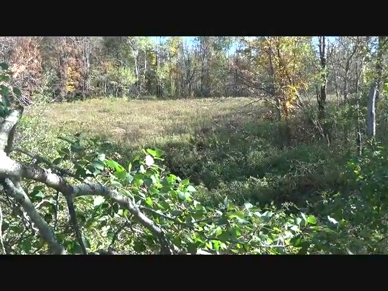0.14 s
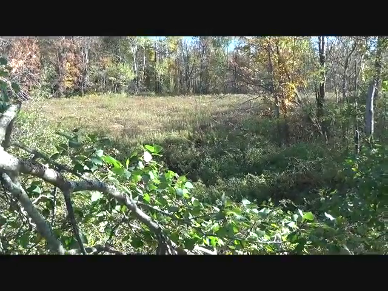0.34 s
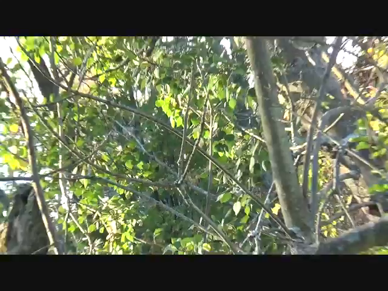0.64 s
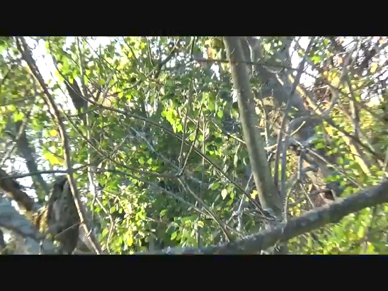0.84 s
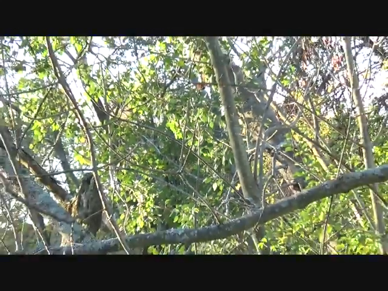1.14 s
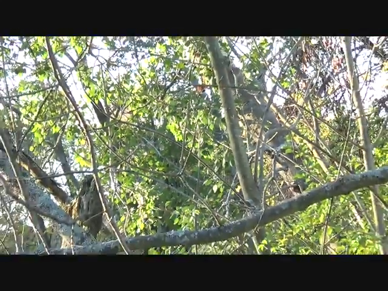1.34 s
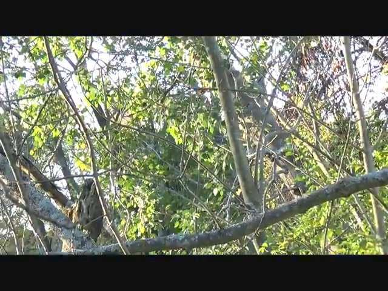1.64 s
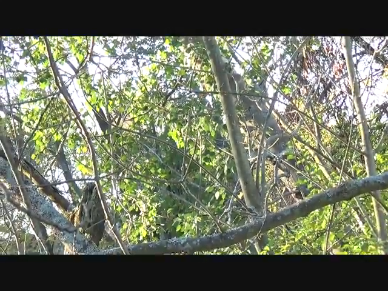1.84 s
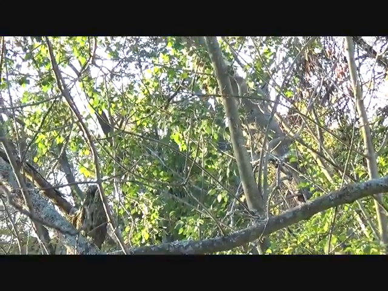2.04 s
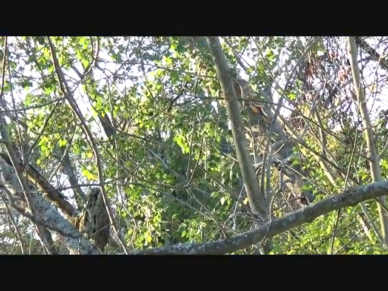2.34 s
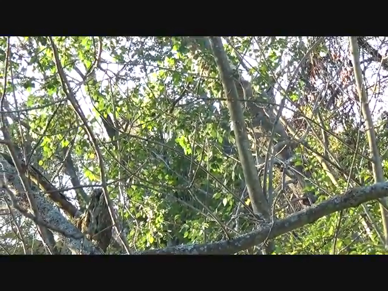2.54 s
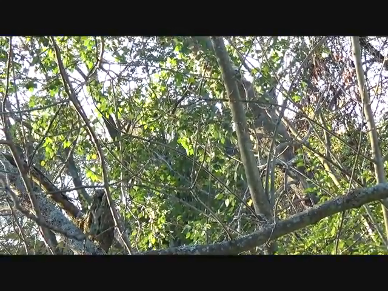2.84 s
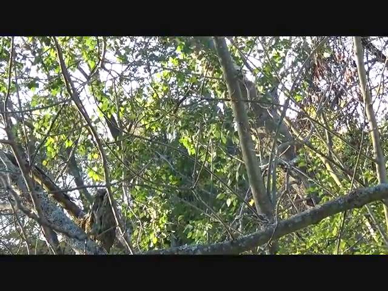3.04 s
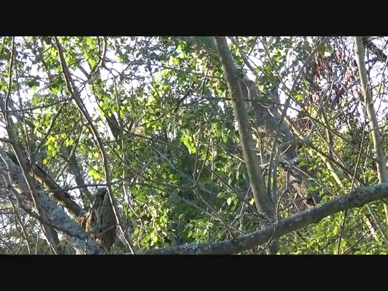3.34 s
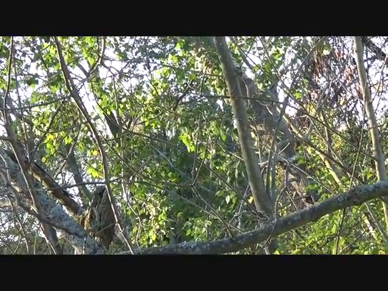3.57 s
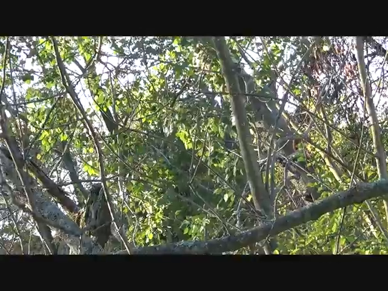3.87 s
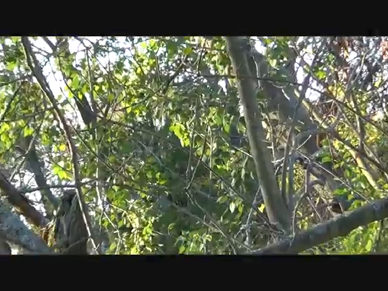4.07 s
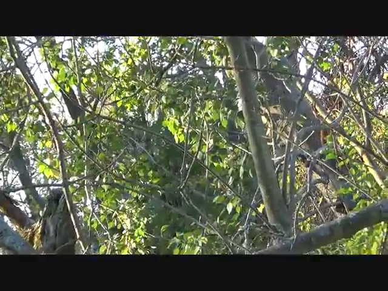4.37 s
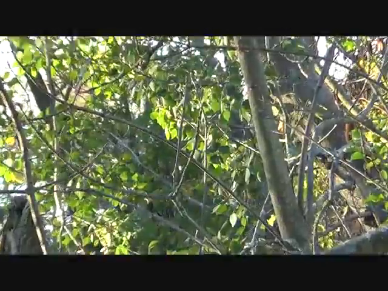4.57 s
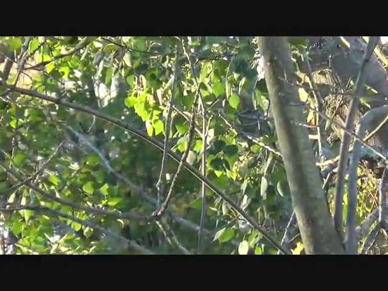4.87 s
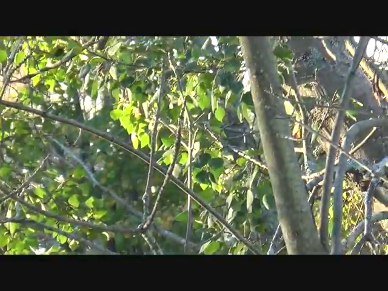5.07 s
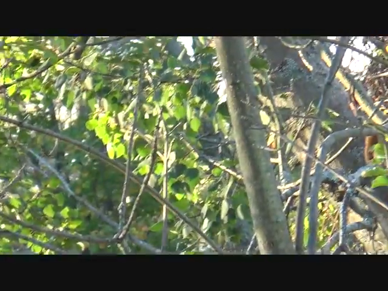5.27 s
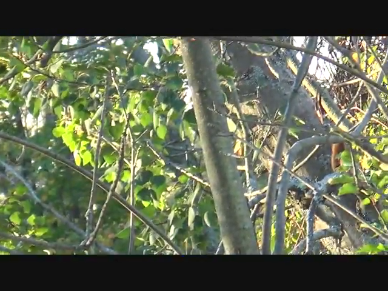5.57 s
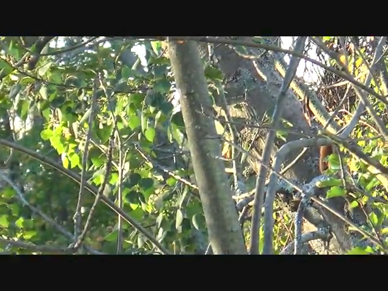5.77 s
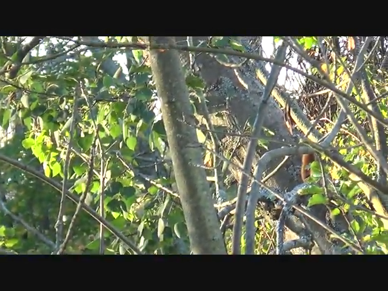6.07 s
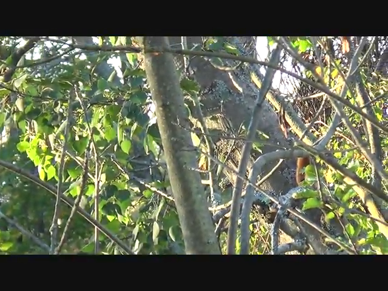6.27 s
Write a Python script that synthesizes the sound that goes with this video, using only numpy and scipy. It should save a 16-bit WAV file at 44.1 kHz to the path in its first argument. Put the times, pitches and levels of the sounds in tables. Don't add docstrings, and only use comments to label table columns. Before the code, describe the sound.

A small handheld camera's built-in stereo microphone picks up faint bird chirps, far-off engines and traffic, and a thin high electronic whine. Light plastic ticks and knocks betray the holding hand. After more than three seconds of near quiet, a squirrel starts a close machine-gun chatter of short buzzy, high syllables, swelling louder and spacing out slightly until the end, ringing briefly off trunks and leaves.

```python
import sys
import numpy as np
from scipy import signal
from scipy.fft import rfft, irfft
from scipy.io import wavfile
from scipy.ndimage import uniform_filter1d

SR = 44100
rng = np.random.default_rng(int(sys.argv[2]) if len(sys.argv) > 2 else 0)


def ratio_of_db(decibels):
    return 10 ** (np.asarray(decibels, float) / 20)


def int16_out(signal):
    q = np.round(np.clip(np.atleast_2d(signal).T, -1, 1) * 32767)
    wavfile.write(sys.argv[1], SR, q.astype(np.int16))


N = 282681
TIME = np.arange(N) / SR


def evened(x):
    return x / np.sqrt(np.mean(abs(x) ** 2) + 1e-20)


def at_time(points, s):
    return np.interp(s, *np.transpose(points))


def at_pitch(points, hz):
    f, value = np.transpose(points)
    return np.interp(np.log(hz + 1), np.log(f + 1), value)


def played(source, rows):
    mix = np.zeros(N)
    for row in rows:
        s, sound = source(*row)
        part = mix[round(s * SR):][:len(sound)]
        part += sound[:len(part)]
    return mix


def cavity(modes, hz):
    power = 1e-8
    for f, width, db in modes:
        detune = (hz ** 2 - f ** 2) / (hz + 1) / width / 0.95
        power = power + ratio_of_db(2 * db) / (1 + detune ** 2) ** 2
    return np.sqrt(power)


def causal_phase(magnitude):
    circle = np.log(np.r_[magnitude, magnitude[-2:0:-1]])
    return np.exp(-1j * signal.hilbert(circle).imag[:len(magnitude)])


def whistle(hz, fuzz_hz):
    wander = fuzz_hz * evened(uniform_filter1d(rng.standard_normal(len(hz)), 60))
    return np.sqrt(2) * np.sin(2 * np.pi * (np.cumsum(hz + wander) / SR + rng.random()))


# (time [s], syllable number)
PACE = [(3.6692, 0), (3.7355, 2), (3.9406, 8), (4.1147, 13), (4.3647, 20), (4.5838, 26), (4.8093, 32),
        (4.9618, 36), (5.322, 45), (5.5776, 51), (5.622, 52), (5.7181, 54), (5.92, 58), (5.9758, 59),
        (6.0386, 60)]
# (time [s], mouth level [dB], pulse rate [Hz], upper mouth re mouth [dB], throat re mouth [dB])
EFFORT = [(3.671, -37, 1304, 5, 2), (3.71, -35, 1000, 6.5, -1), (3.88, -32.5, 963, 5, -5),
          (4.29, -30.5, 955, 5.5, -7), (4.39, -27.5, 958, -5, -10), (4.72, -25, 948.6, -5.5, -11),
          (4.96, -25.5, 897.7, -3.5, -12.5), (5.93, -24, 901, -10.5, -15.5), (6.04, -27.5, 866, -10, -17)]
# (length [ms], mouth [dB], pulse rate [Hz], upper mouth [dB], throat [dB])
SPREAD = (.8, .6, 30, 1.2, 1.0)


def rattle():
    pace_s, number = np.transpose(PACE)
    s = np.interp(np.arange(number[-1] + 1), number, pace_s)
    effort = np.transpose(EFFORT)
    ms = np.where(s == s[0], 14, 12.2)
    voice = np.array([ms] + [np.interp(s, effort[0], column) for column in effort[1:]]).T
    chance = np.clip(rng.standard_normal(voice.shape), -2, 2)
    return np.c_[s, voice + SPREAD * chance]


SLOWING = .19
SHIMMER_DB, WOBBLE = 1.1, .018


def voice_pulses(hz, lead, ms, pulses_hz, chance):
    slowing = SLOWING * (np.arange(24) * 1000 / pulses_hz / ms - .5)
    periods = (1 + slowing + .014 * chance[0]) / pulses_hz
    at = np.cumsum(periods) - 0.377 / pulses_hz
    swell = np.interp(at * 1000 / ms, [0, .15, .5, .85, 1, 1.1], [.7, .9, 1, .8, .55, 0])
    swell = swell * ratio_of_db(SHIMMER_DB * chance[1])
    pulses = (swell * np.exp(-2j * np.pi * hz[:, None] * (at + lead))).sum(1)
    puff = 1 / (1 + 2j * np.pi * hz * .0012)
    breath = irfft(pulses * puff)
    puffs = rfft(breath * rng.standard_normal(len(breath)))
    rasp = .3 * (hz < 7800)
    drive = evened(pulses) + (ratio_of_db(-10) + rasp) * evened(puffs)
    return drive * (1 + .05 * np.exp(-2j * np.pi * hz * 0.0005024))


# (frequency [Hz], width [Hz], level [dB])
VOICE_BOX = [(2180, 1950, -11.5), (3210, 570, 1)]
THROAT = [(3440, 6000, -15), (4500, 1220, 0.5), (6355, 600, -5)]
MOUTH = [(9806, 1430, 8.5), (10420, 390, 2)]
UPPER_MOUTH = [(11340, 370, 7.5), (12710, 1010, 7), (12400, 830, -9)]
TEETH = [(15200, 1200, 0)]
# (time [s], level re mouth [dB])
SQUEAK = [(3.6, -4), (4.3, -12), (4.5, -12), (5.3, -12.5), (6.1, -12.5)]


def syllable(s, ms, mouth_db, pulses_hz, upper_db, throat_db):
    lead, size = .005, 2048
    t, hz = np.arange(size) / SR - lead, np.fft.rfftfreq(size, 1 / SR)
    chance = rng.standard_normal((3, 24))
    u = t / (ms / 1000)
    drive = voice_pulses(hz, lead, ms, pulses_hz, chance)

    def gape(middle, spread):
        return np.exp(-((u - middle) / spread) ** 2)

    late = np.clip(u / .22, 0, 1)
    shapes = [gape(.45, .7), gape(.42, .45), gape(.38, .33)]
    parts = [(MOUTH, 0, 1), (UPPER_MOUTH, upper_db, late)]
    parts += [(TEETH, .5 * upper_db - 17, late), (VOICE_BOX, -23., shapes[0])]
    parts += [([mode], throat_db + mode[2] - .3, shape) for mode, shape in zip(THROAT, shapes)]
    colours = []
    for (modes, db, _), shift in zip(parts, chance[2]):
        colours.append(ratio_of_db(db) * evened(cavity(modes, hz * (1 + WOBBLE * shift))))
    drive = drive * causal_phase(np.linalg.norm(colours, axis=0))
    level = np.sqrt(ms / 1000 * SR / size) / irfft(drive * colours[0]).std()
    sound = level * sum(shape * irfft(drive * colour) for colour, (_, _, shape) in zip(colours, parts))

    glide = np.clip(3500 * (1 + 3 * WOBBLE * chance[2, 8]) - 450000.0 * t, 2900, 4800)
    squeak = np.exp(-((t + .0004) / .0014) ** 2) * whistle(glide, fuzz_hz=200)
    lips_hz = 9200 * (1 + WOBBLE * chance[2, 9]) + 0 * t
    lips = np.exp(-((t - .0009) / .0012) ** 2) * whistle(lips_hz, fuzz_hz=200)
    chest_hz = pulses_hz * (1 - SLOWING * (np.clip(u, 0, 1) - .5))
    chest = gape(0.62, 0.42) * whistle(chest_hz, fuzz_hz=57.5)
    sound += ratio_of_db(at_time(SQUEAK, s) + SHIMMER_DB * chance[2, 10]) * squeak
    sound += ratio_of_db(-4.1) * lips + ratio_of_db(-15 + 0.33 * throat_db) * chest
    return s - lead - .0005, ratio_of_db(mouth_db) * sound


# (frequency [Hz], fade time [s])
ECHO_FADE = [(500, 0.098), (2000, 0.43), (4500, 0.44), (10000, 0.28), (15000, 0.11)]
# (frequency [Hz], level [dB])
SCATTER = [(900, 3), (2300, 3), (4500, -1.5), (7000, .3), (9800, -2), (11800, 2.5), (13500, 4), (15000, 6)]


def trees(x):
    out = np.zeros((2, N))
    for k in range(3):
        taps = rng.standard_normal((2, SR // 2)) * (rng.random((2, SR // 2)) < .05)
        taps[:, :150] = 0
        taps[1] = .83 * taps[0] + .56 * taps[1]
        hz, t, z = signal.stft(taps, SR, nperseg=128)
        fade_db = at_pitch(SCATTER, hz)[:, None] - 60 * t / at_pitch(ECHO_FADE, hz)[:, None]
        tail = signal.istft(z * ratio_of_db(fade_db), SR, nperseg=128)[1]
        tail = tail / np.linalg.norm(tail[0])
        turn = np.sqrt(2 / 3) * np.cos(np.pi * (2.3 * TIME + k / 3))
        out += signal.fftconvolve((x * turn)[None], tail, axes=1)[:, :N]
    return out


def tick(s, db, ring_hz, width_hz, ms):
    t = np.arange(1024) / SR
    crackle = rng.standard_normal(1024) * np.exp(-(t * 1000 / ms) ** 2)
    body = cavity([(ring_hz, width_hz, 0)], np.fft.rfftfreq(1024, 1 / SR))
    sound = irfft(rfft(crackle) * body * causal_phase(body))
    return s, ratio_of_db(db) * sound / abs(sound).max()


# (time [s], peak level [dB])
TICKS = [(.766, -44), (.784, -44), (.991, -42), (1.042, -50), (1.116, -35), (1.152, -42), (1.16, -36.5),
         (1.172, -50), (1.207, -47), (1.224, -40), (1.261, -41), (1.4094, -15), (1.4104, -15), (1.821, -44),
         (2.454, -43), (2.7065, -39), (2.742, -44), (2.788, -36), (2.899, -48), (2.950, -39), (2.954, -40),
         (3.107, -42), (6.328, -47)]
# (time [s], peak level [dB], ring [Hz], crackle length [ms])
KNOCKS = [(0.955, -39.5, 1410, 13), (.988, -44, 2500, 5.6), (.995, -48, 2500, 18), (1.029, -46, 2200, 1.9),
          (1.41, -25.5, 3700, 0.91), (1.412, -38.5, 1100, 5.6), (2.788, -40, 4500, 2.9),
          (3.9723, -22.5, 2210, 1.25), (4.224, -35, 1410, 2.2), (4.294, -29.5, 1700, 2.5),
          (4.401, -27, 2190, 5.4), (4.6773, -29.5, 1500, 5.4), (5.0357, -35.5, 1500, 1.5),
          (5.155, -27, 1700, 2.7)]
# (time [s], peak level [dB], ring [Hz], crackle length [ms])
PINGS = [(.959, -52, 4800, 7.6), (.965, -52, 4500, 1.1), (.987, -38.5, 5030, 5.2),
         (0.989, -30.5, 1050, 2.8), (1.031, -42.5, 5130, 1.4), (1.032, -37.5, 960, .6),
         (1.160, -42, 2640, 0.79), (1.199, -46.5, 4500, 3.3), (1.41, -26, 14100, 0.55),
         (1.4104, -22, 9650, 1.1), (1.470, -51, 5000, 1.1), (2.716, -48, 4500, 0.6),
         (3.670, -46, 1310, 7.2), (3.824, -43, 1600, 7.8), (3.9709, -13, 4750, 3.8), (4.04, -37, 955, 10),
         (4.096, -34, 970, 14), (4.294, -37.5, 990, 2.5), (4.738, -33.5, 1050, 1.4),
         (6.380, -48, 3800, 1.5), (6.39, -40, 3300, 0.91)]


def handling():
    rows = [(s, db, 9800, 5300, .5) for s, db in TICKS]
    rows += [(s, db, hz, 0.9 * hz, ms) for s, db, hz, ms in KNOCKS]
    rows += [(s, db, hz, 0.3 * hz, ms) for s, db, hz, ms in PINGS]
    return played(tick, rows)


# (time [s], length [s], level [dB], start [Hz], end [Hz], fuzz [Hz])
BIRDS = [
    (.017, 0.038, -59, 3600, 3800, 150),
    (.018, 0.012, -58.5, 5370, 5650, 200),
    (.16, .017, -67, 5700, 5700, 100),
    (2.28, 0.08, -63, 5600, 5380, 300),
    (2.361, 0.05, -67, 5470, 5160, 300),
    (2.661, 0.18, -69.5, 2580, 2500, 39.75),
    (2.97, .28, -71, 3060, 3190, 40),
]


def bird(s, length, db, start_hz, end_hz, fuzz_hz):
    hz = np.linspace(start_hz, end_hz, round(length * SR))
    return s, ratio_of_db(db) * whistle(hz, fuzz_hz) * signal.windows.tukey(len(hz), .6)


# (time [s], length [s], level [dB], strongest tone [Hz])
EARLY_HUM = [
    (0, 0.245, -55, 134),
    (0.338, 0.27, -53.5, 134.5),
    (.05, 0.71, -62, 203.5),
]
LATE_HUM = [(.95, 0.4, -60, 153), (1.501, 0.52, -63.5, 156), (2.1, 0.85, -61, 163),
            (3.369, 0.9, -62.5, 161), (4.329, 0.58, -54.5, 163.5), (4.98, 0.81, -57.5, 160),
            (5.38, 0.34, -57, 167), (6.0, .45, -53, 163.6), (1.281, 0.21, -61.5, 291),
            (1.948, 0.59, -64.5, 291), (2.7, 0.64, -66.5, 290)]


def engine(s, length, db, hz):
    hz = np.full(round(length * SR), float(hz))
    return s, ratio_of_db(db) * whistle(hz, fuzz_hz=5.8) * signal.windows.tukey(len(hz), .4)


# (frequency [Hz], level per Hz [dB])
AIR = [(25, -30), (50, -40), (70, -9), (107, -1), (220, -4.5), (340, -8.5), (600, -8), (900, -8),
       (1300, -12), (1800, -18.5), (3500, -21.5), (7300, -25), (11000, -27.5), (15800, -29)]
# (time [s], level [dB])
TRAFFIC = [(0, -5.5), (.6, -1), (1.5, -0.8), (3.6, 0.15), (4.45, 5.5), (5.5, 5.6), (6.41, 6.5)]
# (frequency [Hz], likeness [0 to 1])
SAME = [(30, 0.39), (60, 0.61), (150, 0.93), (380, 0.86), (950, 0.99), (2380, 0.87), (4400, 0.86),
        (8100, 0.69), (11500, 1), (15000, 0.85)]
# (frequency [Hz], left minus right [dB])
LEAN = [(30, 21), (70, -7.5), (150, -1), (300, -1), (15000, 0)]


def air():
    frames, hz = N // 256 + 5, np.fft.rfftfreq(1024, 1 / SR)[:, None]
    a, b, c, d, patches = rng.standard_normal((frames, 513, 5)).T
    patches = evened(uniform_filter1d(uniform_filter1d(patches, 12, 0), 14, 1))
    t = np.arange(frames) * 256 / SR - 512 / SR
    traffic = at_time(TRAFFIC, t)
    first_view = 1.5 * (t < 0.75)
    rumble = (0.79 * traffic + 1.4 + first_view) / (1 + (hz / 350) ** 4)
    roar = traffic * np.exp(-np.log((hz + 1) / 1000) ** 2 / 0.99)
    rustle = (0.6 * np.maximum(traffic, 0) + 0.49) / (1 + (3000 / (hz + 1)) ** 4)
    same = np.clip(at_pitch(SAME, hz), -1, 1)
    left = a + 1j * b
    right = same * left + np.sqrt(1 - same ** 2) * (c + 1j * d)
    lean = np.array([.5, -.5])[:, None, None] * at_pitch(LEAN, hz)
    z = np.array([left, right]) * ratio_of_db(at_pitch(AIR, hz) + 0.68 * patches + lean)
    still = signal.istft(z, nperseg=1024, noverlap=768)[1]
    moving = signal.istft(z * ratio_of_db(rumble + roar + rustle), nperseg=1024, noverlap=768)[1]
    return ratio_of_db(-52.72) * moving[:, :N] / still.std()


# (frequency [Hz], level [dB])
CIRCUIT = [
    (7854, -86),
    (13119, -82),
    (13248, -82),
]


def whine():
    line_hz, beat_hz, field_hz = 15734.2, 12.785, 59.94
    turn = 2 * np.pi * line_hz * TIME
    line = np.sin(turn) + .55 * np.sin(turn + 2 * np.pi * beat_hz * TIME + 2.53)
    field = uniform_filter1d(1. * ((TIME * field_hz) % 1 > .05), 20)
    faint = sum(ratio_of_db(db) * np.sin(2 * np.pi * hz * TIME) for hz, db in CIRCUIT)
    return np.sqrt(2) * (ratio_of_db(-58.5) * line * field + faint)


def scene():
    squirrel = played(syllable, rattle())
    near = squirrel * ratio_of_db([[-.1], [.1]]) + ratio_of_db(-5.5) * trees(squirrel)
    near = near + handling() * ratio_of_db([[1.1], [-1.1]])
    engines = played(engine, EARLY_HUM) * ratio_of_db([[-4.5], [3.]])
    engines = engines + played(engine, LATE_HUM) * ratio_of_db([[-.8], [.8]])
    return near + played(bird, BIRDS) + engines + air() + whine()


# (frequency [Hz], side minus middle [dB])
STEREO_NEEDS = [(100, -40), (1200, -24), (2000, -9), (4700, -8), (6000, -19), (7500, -10), (9500, -24),
                (11000, -18), (12800, -10), (15000, -7)]


def narrowed(x, size=2048, count=16):
    hz, _, z = signal.stft(np.array([x[0] + x[1], x[0] - x[1]]) / 2, SR, nperseg=size)
    band = np.arange(len(hz)) // count * count
    power = uniform_filter1d(abs(z) ** 2, count, 1)[:, band] + 1e-20
    z[1] *= np.sqrt(power[1] / power[0]) > ratio_of_db(at_pitch(STEREO_NEEDS, hz))[:, None]
    mid, side = signal.istft(z, SR, nperseg=size)[1][:, :N]
    return np.array([mid + side, mid - side])


def roll_off(x):
    return signal.sosfilt(signal.butter(12, 17200, fs=SR, output="sos"), x)


# (time [s], level [dB])
SCENE_CHANGE = [
    (0, 2.5),
    (.6, 0.5),
    (.63, -5.5),
    (.646, -28),
    (.662, -5),
    (.69, 1),
    (6.41, -1),
]


def record(dry):
    dry = signal.lfilter(*signal.butter(2, 38, "high", fs=SR), dry)
    dipped = dry * ratio_of_db(at_time(SCENE_CHANGE, TIME))
    edge = signal.firwin(1501, 15815, window=("kaiser", 8), fs=SR)
    mix = signal.oaconvolve(narrowed(dipped), edge[None], "same")
    return roll_off(mix)


dry = scene()
out = record(dry)
int16_out(out)
```